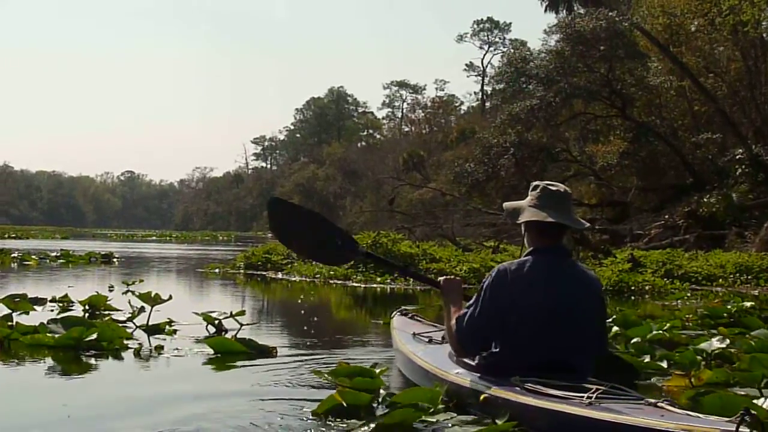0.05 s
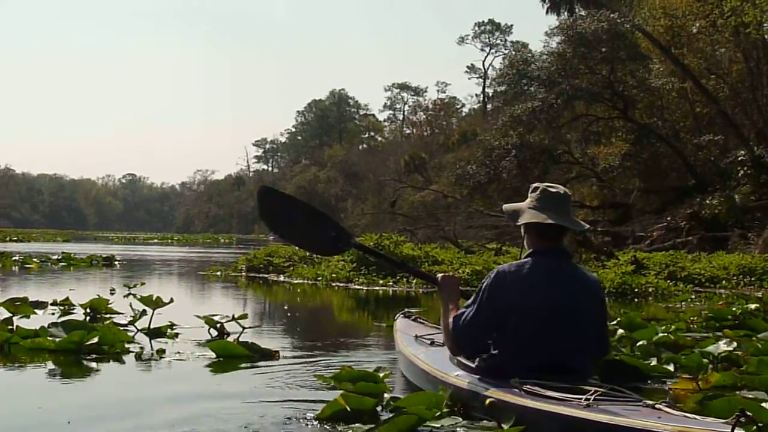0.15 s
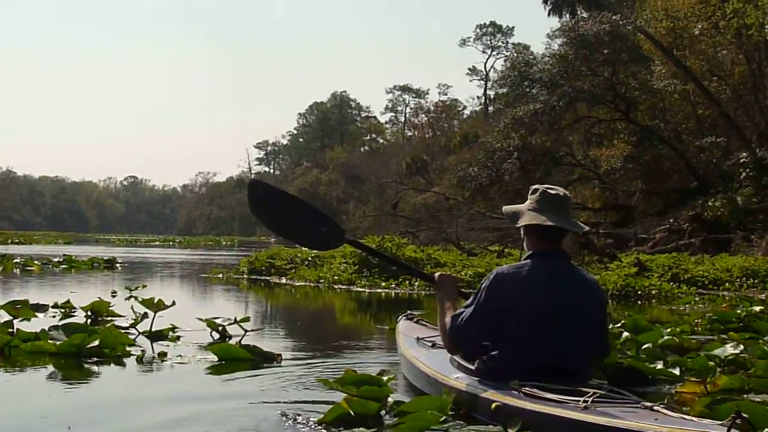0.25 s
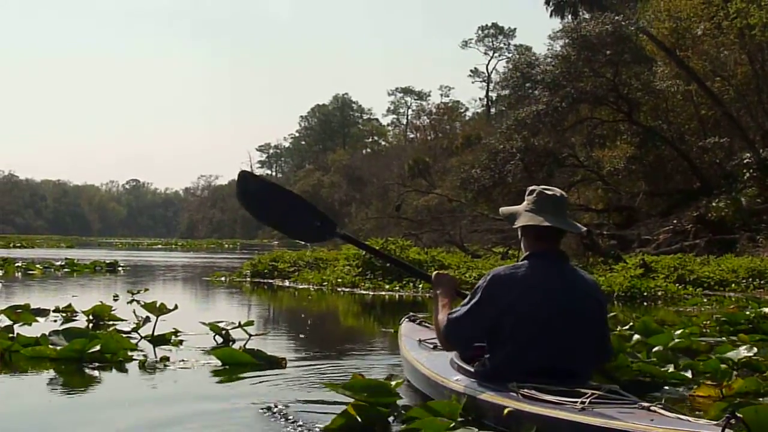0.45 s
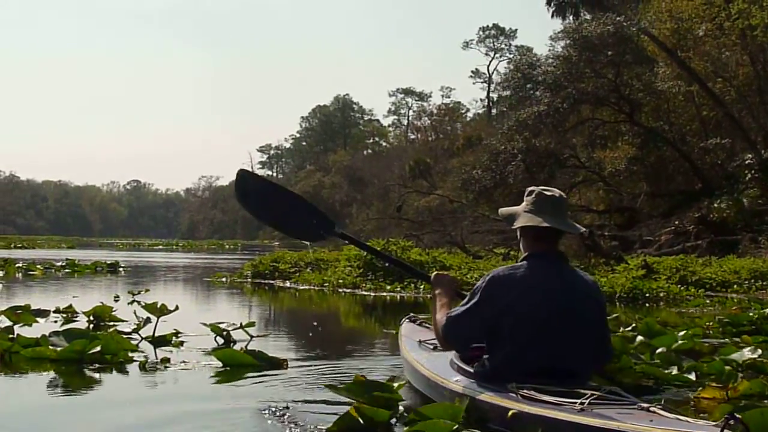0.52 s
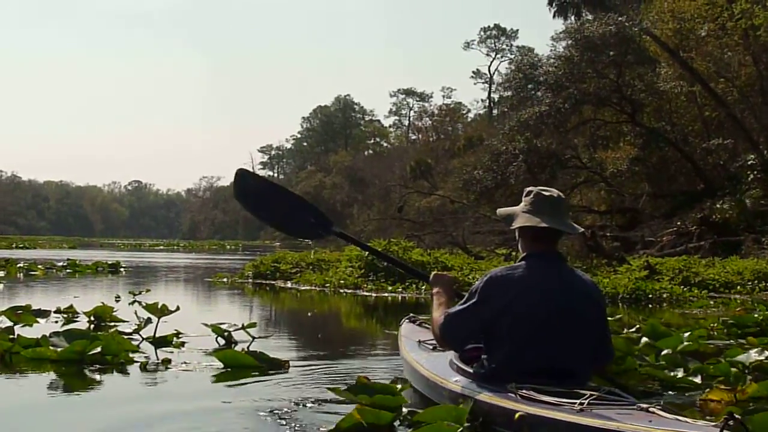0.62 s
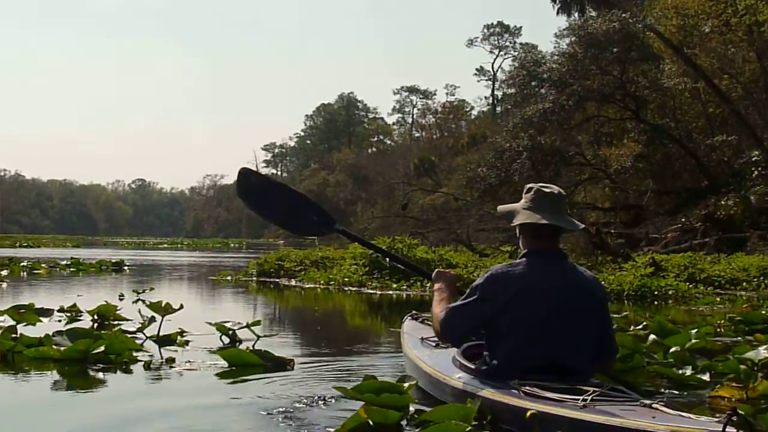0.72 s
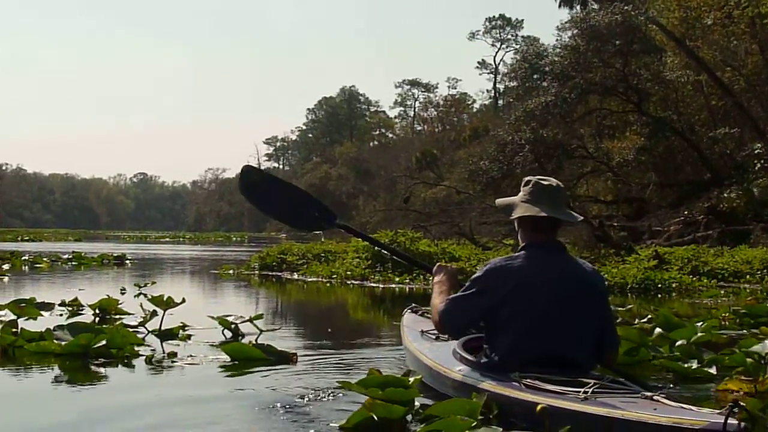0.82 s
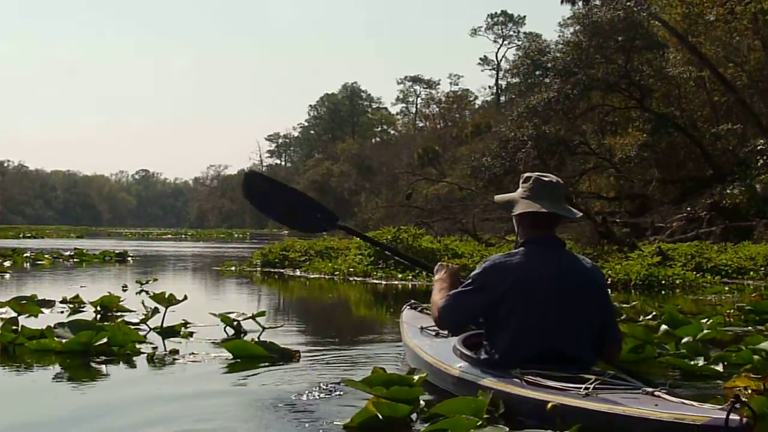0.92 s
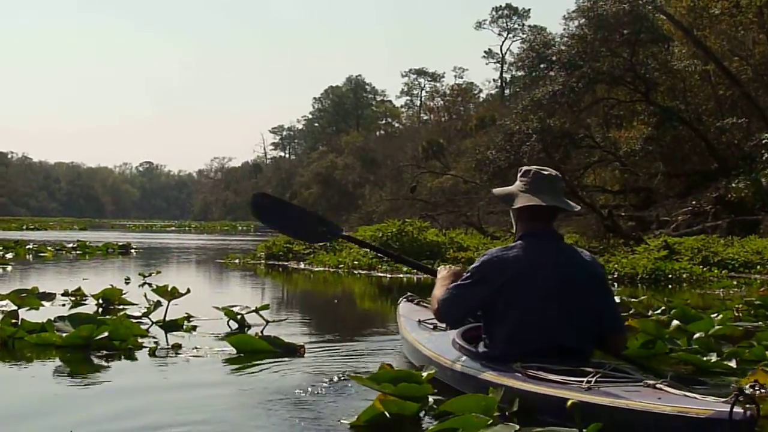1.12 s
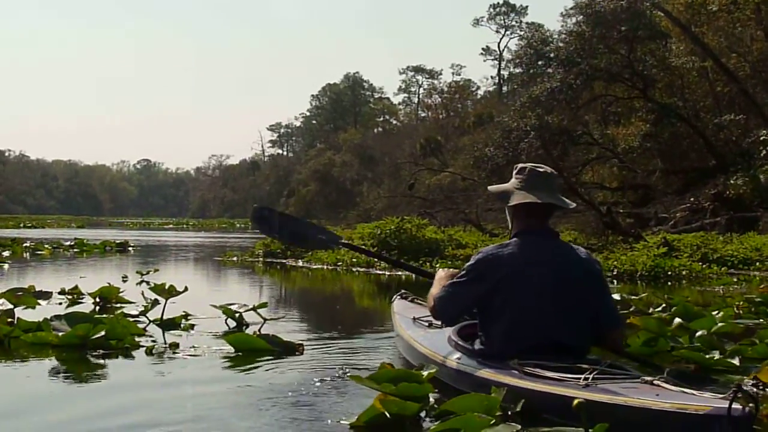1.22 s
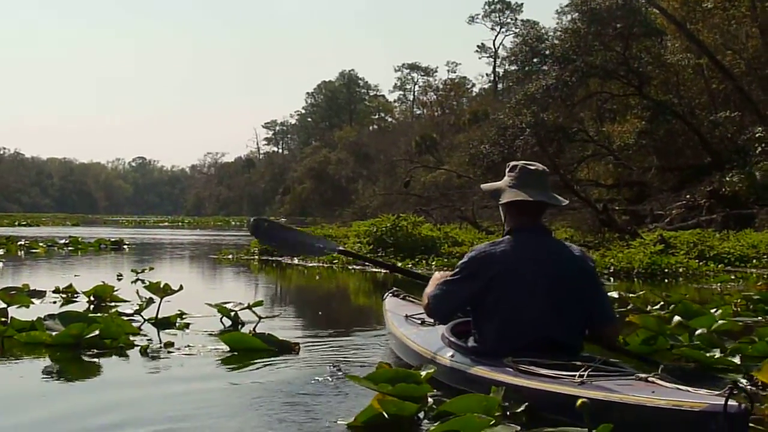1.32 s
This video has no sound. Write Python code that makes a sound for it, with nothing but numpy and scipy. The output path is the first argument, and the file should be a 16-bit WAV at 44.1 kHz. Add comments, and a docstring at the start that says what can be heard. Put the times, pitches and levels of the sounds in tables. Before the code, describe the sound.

A wading bird's wailing call comes after wind and paddle sounds on a calm river. Wind rumbles and thumps on the microphone, peaking in a loud gust around 0.3 seconds, while a close kayak paddle softly sloshes and ticks. Faint drips fall near 0.7 seconds. From 0.8 seconds the bird gives a soft husky note and rattle, then a clear, lightly echoing wail from 1.05 to 1.35 seconds.

```python
"""Wind rumbles and thumps on the microphone over a faint steady hiss, swelling to one rough gust.
Close by, a kayak paddle sloshes, ticks once and sheds drips that ring tiny bubbles in a calm river.
Then a limpkin calls: a soft, husky lead-in note, a rattle of pulses ringing its throat, a squeak as the
voice catches, and a clear arched wail. The call echoes off the wooded bank."""
import sys
import numpy as np
from scipy import signal
from scipy.fft import rfft, irfft
from scipy.io import wavfile

SR = 44100
rng = np.random.default_rng(int(sys.argv[2]) if len(sys.argv) > 2 else 0)


def to_wav(s):
    """Save 16-bit WAV."""
    ch = np.atleast_2d(s).T  # columns
    pcm = np.round(np.clip(ch, -1, 1) * 32767)  # PCM
    wavfile.write(sys.argv[1], SR, pcm.astype(np.int16))


N = 59535
T = np.arange(N) / SR


def from_db(db):
    """Decibels to gain."""
    return 10 ** (np.asarray(db) / 20)


def unit_rms(x):
    """Scale to unit power."""
    return x / np.sqrt(np.mean(x ** 2) + 1e-20)


def curves(rows):
    """Breakpoints to automation curves, one for each column after time."""
    times, *columns = np.transpose(rows)
    return [np.interp(T, times, column) for column in columns]


def noise(colour):
    """Unit-power noise through an EQ curve."""
    hz, db = np.transpose(colour)
    bins = np.maximum(np.fft.rfftfreq(N, 1 / SR), 1)
    eq = from_db(np.interp(np.log(bins), np.log(hz), db))
    return unit_rms(irfft(rfft(rng.standard_normal(N)) * eq, N))


def drift(hz):
    """Unit-power random wobble, mostly slower than hz."""
    rolloff = 1 + (np.fft.rfftfreq(N, 1 / SR) / hz) ** 2
    return unit_rms(irfft(rfft(rng.standard_normal(N)) / rolloff, N))


def resonate(x, hz, width):
    """Two matching band-passes in series, unity gain at the peak."""
    r = np.exp(-np.pi * width / SR)
    b = np.array([1, 0, -1]) * (1 - r * r) / 2
    a = [1, -2 * r * np.cos(2 * np.pi * hz / SR), r * r]
    return signal.lfilter(b, a, signal.lfilter(b, a, x + 1e-18) + 1e-18)


# fader ride of the rumble (time [s], level [dB])
WIND_LEVEL = [(0, -57), (.11, -44.5), (.2, -44), (.3, -36.5), (.365, -27), (.395, -51.5), (.45, -49),
              (.5, -50), (.67, -52.5), (.75, -46), (.78, -41.5), (.82, -48.5), (.97, -44.5), (1.06, -40),
              (1.1, -51.5), (1.35, -61.5)]
# its bass-heavy EQ (frequency [Hz], gain [dB])
WIND_EQ = [(15, -14.5), (40, 0.5), (80, 0), (140, -4.5), (220, -12), (350, -21.5), (700, -42.5),
           (2000, -75.5)]
def wind_rumble():
    """Wind on the microphone: a low rumble that swells and sinks."""
    db, = curves(WIND_LEVEL)
    return from_db(db) * noise(WIND_EQ)


# EQ of the background bed (frequency [Hz], gain [dB])
AIR_EQ = [(20, 3), (100, -3.5), (280, -2), (400, -3), (520, -1.5), (750, -12.5), (1100, -12.5),
          (1700, -20.5), (2600, -23.5), (4000, -26.5), (7000, -27), (9000, -33)]
def air():
    """A faint, steady bed of air and hiss."""
    return from_db(-53.5) * noise(AIR_EQ)


# swells of water (time [s], width [s], level [dB])
SLOSHES = [(0.033, 0.014, -62), (.115, 0.014, -56), (0.267, 0.0034, -65), (0.331, 0.0046, -47),
           (.347, 0.0046, -53.5), (0.653, 0.0031, -68), (.82, 0.058, -56.5)]
# their mid-heavy EQ (frequency [Hz], gain [dB])
SLOSH_EQ = [(250, -5), (500, 2.5), (850, 8.5), (1200, -9.5), (1700, -19.5), (3500, -41)]
def paddle_sloshes():
    """The paddle stirs the water into soft swells of gurgling noise."""
    swell = sum(from_db(db) * np.exp(-.5 * ((T - at) / width) ** 2) for at, width, db in SLOSHES)
    gurgle = unit_rms(noise(SLOSH_EQ) * from_db(4 * drift(120)))
    return swell * gurgle


# wind thumps (time [s], peak level [dB], centre frequency [Hz])
BUFFETS = [(.114, -33.5, 120), (0.153, -32.5, 110), (0.225, -24.5, 85), (.248, -24.5, 142),
           (.275, -25.5, 198), (0.292, -21.5, 108.5), (.307, -15.5, 173), (.327, -15.5, 229.3),
           (0.336, -14, 124), (.346, -13, 241), (0.365, -20, 109), (.451, -50, 80), (.768, -31, 99),
           (0.778, -33.5, 95), (.821, -38, 91), (0.837, -33.5, 100), (.86, -35, 101), (0.887, -30, 100),
           (.964, -31.5, 139), (0.996, -34, 120), (1.039, -28.5, 222), (1.044, -31.5, 131.4),
           (1.059, -30, 100.7), (1.158, -40.5, 100)]
def wind_buffets(width_cycles=.53):
    """Each buffet is a suction on the microphone with a short rebound."""
    out = np.zeros(N)
    for at, db, hz in BUFFETS:
        cycles = hz * (T - at)
        out -= from_db(db) * np.cos(2 * np.pi * cycles) * np.exp(-(cycles / width_cycles) ** 2)
    return out


# low-mid EQ of the gust (frequency [Hz], gain [dB])
GUST_EQ = [(30, -20), (120, -3.5), (290, 2.5), (420, -12), (650, -22), (1000, -45), (2000, -59),
           (3500, -75)]
def wind_gust(peak_s=.3352, width_s=.019, db=-28.5):
    """The strongest gust breaks into a burst of turbulence."""
    return from_db(db) * np.exp(-.5 * ((T - peak_s) / width_s) ** 2) * noise(GUST_EQ)


# ringing modes of the paddle (frequency [Hz], gain [dB])
TICK_MODES = [(1600, -2), (2020, 2), (2260, -2)]
def paddle_tick(start_s=.324, level_db=-47.5, t60_s=.013):
    """One light, dry tick: the paddle's modes ring and die at once."""
    age = np.maximum(T - start_s, 0)
    modes = sum((-1) ** k * from_db(db) * np.sin(2 * np.pi * hz * age)
                for k, (hz, db) in enumerate(TICK_MODES))
    return from_db(level_db - 60 * age / t60_s) * modes


# drops off the paddle (time [s], peak level [dB], starting pitch [Hz])
DRIPS = [(0.622, -54, 1670), (.654, -50, 1260), (.712, -55, 1680), (.735, -50, 1205)]
def drips(t60_s=.035, rise_per_s=3.1):
    """Each drop rings a small bubble that bends up in pitch."""
    out = np.zeros(N)
    for at, db, hz in DRIPS:
        age = np.maximum(T - at, 0)
        phase = 2 * np.pi * hz * age * (1 + rise_per_s * age / 2)
        out += from_db(db - 60 * age / t60_s) * np.sin(phase)
    return out


# pulsing of the bird's voice (time [s], rate [Hz])
PULSE_RATE = [(.78, 107), (.92, 138), (.97, 186), (1.01, 190), (1.06, 158)]
def voice_cycles(jitter=.06):
    """Running count of the voice's uneven pulses, the clock for lead-in and rattle."""
    rate, = curves(PULSE_RATE)
    return np.cumsum(rate * (1 + jitter * drift(50))) / SR


# contour of the opening note (time [s], pitch [Hz], level [dB])
LEAD_IN = [(.77, 1040, -74), (.8, 1013, -55.5), (.83, 1016, -52.5), (.845, 990.4, -54.5),
           (.878, 986.4, -63.5), (.9, 1005, -54), (.94, 1030, -52.5), (.958, 1029, -63.5),
           (.985, 1000, -67), (1.015, 1005, -52.5), (1.05, 1005, -73.5)]
def lead_in(cycles, jitter=.008, breath_db=-10, flutter_depth=.4):
    """A soft, wavering note, husky with breath and fluttering at the pulse rate."""
    hz, db = curves(LEAD_IN)
    phase = 2 * np.pi * np.cumsum(hz * (1 + jitter * drift(90))) / SR
    breath = unit_rms(resonate(rng.standard_normal(N), hz.mean(), width=220))
    voice = unit_rms(np.sqrt(2) * np.sin(phase) + from_db(breath_db) * breath)
    flutter = 1 + flutter_depth * np.cos(2 * np.pi * cycles)
    gate = (T > LEAD_IN[0][0]) & (T < LEAD_IN[-1][0])
    return from_db(db) * voice * flutter * gate


# throat resonances (frequency [Hz], width [Hz], gain [dB])
FORMANTS = [(1390, 270, 5), (1560, 110, 3.5), (1840, 290, -2.5), (2284, 260, 1), (2720, 380, -14),
            (3800, 260, -11.5)]
# rattle bursts (time [s], length [s], level [dB], treble tilt [dB/octave])
RATTLES = [(.785, 0.03, -68, -3), (0.915, 0.033, -62.5, -3), (0.941, 0.0098, -62.5, 2),
           (0.956, 0.022, -56, -4.5), (0.997, 0.018, -55, -0.5), (1.051, 0.014, -58, -0.5)]
def rattle(cycles, breath=.25, attack_s=.0025, release_s=.0092):
    """Separate pulses, each with a puff of air, ring the throat in short bursts."""
    pulses = np.diff(np.floor(cycles), prepend=0) * from_db(2 * drift(100))
    puffs = rng.standard_normal(N) * np.exp(-5 * (cycles % 1))
    source = unit_rms(pulses) + breath * unit_rms(puffs)
    rings = [from_db(db) * resonate(source, hz, width) for hz, width, db in FORMANTS]
    octaves = [np.log2(hz / FORMANTS[0][0]) for hz, _, _ in FORMANTS]
    out = np.zeros(N)
    for at, length, db, tilt in RATTLES:
        voice = unit_rms(sum(from_db(tilt * octave) * ring for octave, ring in zip(octaves, rings)))
        attack = np.clip((T - at) / attack_s, 0, 1)
        release = np.exp(-np.maximum(T - at - length, 0) / release_s)
        out += from_db(db) * voice * attack * release
    return out


# partials of the squeak (harmonic [number], level [dB])
SQUEAK_HARMONICS = [(1, -65.5), (2, -57.5), (3, -65)]
def squeak(peak_s=1.018, width_s=.013, centre_hz=1240, rise_hz_per_s=3800, jitter=.02):
    """The voice half catches: a brief, unsteady tone rising out of the rattle."""
    offset = T - peak_s
    hz = (centre_hz + rise_hz_per_s * offset) * (1 + jitter * drift(200))
    phase = 2 * np.pi * np.cumsum(hz) / SR
    tone = sum(from_db(db) * np.sin(k * phase) for k, db in SQUEAK_HARMONICS)
    return np.sqrt(2) * tone * np.exp(-(offset / width_s) ** 4)


# the wail's arch (time [s], pitch [Hz])
WAIL_PITCH = [(1.02, 1328), (1.06, 1337), (1.085, 1378), (1.13, 1377), (1.19, 1395), (1.25, 1386),
              (1.30, 1371), (1.325, 1378), (1.35, 1315)]
# its fader rides (time [s], fundamental level [dB], overtone bus level [dB])
WAIL_LEVEL = [(1.018, -75, -85), (1.027, -52, -78), (1.044, -60, -78), (1.053, -43.5, -63),
              (1.088, -43, -60), (1.101, -51, -61), (1.113, -42, -58), (1.135, -39, -53), (1.175, -47, -55),
              (1.195, -43.5, -51), (1.236, -45, -51.5), (1.256, -47, -58), (1.28, -44, -53),
              (1.3, -43, -61), (1.312, -43, -54), (1.326, -53, -65), (1.338, -38, -58), (1.35, -46, -58)]
# its overtones (harmonic [number], gain at the top of the arch [dB], loss as pitch falls [dB/100 Hz])
WAIL_OVERTONES = [(2, -1.5, -5.5), (3, -13, -1), (4, -33.5, 0.5)]
def wail(jitter=.0023, shimmer_db=.34, throb_s=1.056, throb_fade_s=.016, throb_depth=.7):
    """A harmonic tone that starts hoarse, turns clean and brightens toward the top of its arch."""
    hz, = curves(WAIL_PITCH)
    fundamental_db, bus_db = curves(WAIL_LEVEL)
    phase = 2 * np.pi * np.cumsum(hz * (1 + jitter * drift(50))) / SR
    sag = (hz.max() - hz) / 100
    tone = from_db(fundamental_db) * np.exp(1j * phase)
    for k, gain_db, loss in WAIL_OVERTONES:
        db = bus_db + gain_db - loss * sag + shimmer_db * drift(32)
        tone += from_db(db) * np.exp(1j * k * phase)
    # the rattle's pulsing carries into the wail as a brief upper sideband
    rate, = curves(PULSE_RATE)
    depth = throb_depth * np.exp(-np.abs(T - throb_s) / throb_fade_s)
    throb = 1 + depth * np.exp(2j * np.pi * rate * (T - throb_s))
    return np.sqrt(2) * (tone * throb).imag * (T > WAIL_LEVEL[0][0])


# slapbacks off the bank (delay [s], gain [dB])
ECHOES = [(.047, -25), (.083, -22), (.121, -25), (.178, -23)]
def bank_echoes(call, tail_db=-15, t60_s=.9, fade_in_s=.04, cutoff_hz=5100):
    """The wooded bank returns a few dull echoes and a diffuse tail from the trees."""
    tail = rng.standard_normal(N) * from_db(-60 * T / t60_s) * np.clip(T / fade_in_s, 0, 1)
    response = from_db(tail_db) * unit_rms(tail) / np.sqrt(N)
    for delay, db in ECHOES:
        response[int(delay * SR)] += from_db(db)
    high_cut = signal.butter(1, cutoff_hz, fs=SR, output="sos")
    return signal.sosfilt(high_cut, signal.fftconvolve(call, response)[:N])


def scene():
    """Mono mix: the bird with its echoes, wind and paddle close and dry, air underneath."""
    cycles = voice_cycles()
    bird = lead_in(cycles) + rattle(cycles) + squeak() + wail()
    echoes = bank_echoes(bird)
    wind = wind_gust() + wind_rumble() + wind_buffets()
    paddle = paddle_sloshes() + paddle_tick() + drips()
    return (bird + echoes + wind + paddle + air())[None]


def record(dry, whine_hz=6730, whine_db=-86, cutoff_hz=8100):
    """A faint electronic whine joins the mix, then a steep high cut takes off the top."""
    whine = np.sqrt(2) * from_db(whine_db) * np.sin(2 * np.pi * whine_hz * T)
    high_cut = signal.butter(28, cutoff_hz, fs=SR, output="sos")
    return signal.sosfilt(high_cut, dry + whine)


dry = scene()
out = record(dry)
to_wav(out)
```